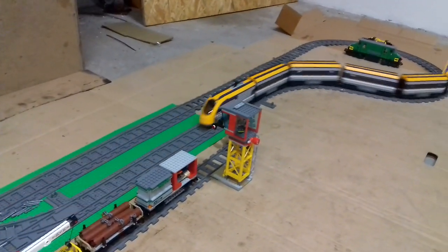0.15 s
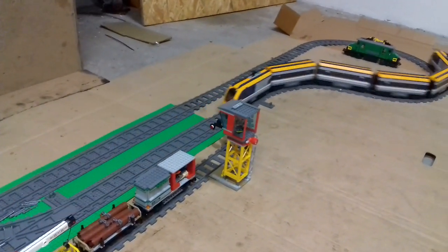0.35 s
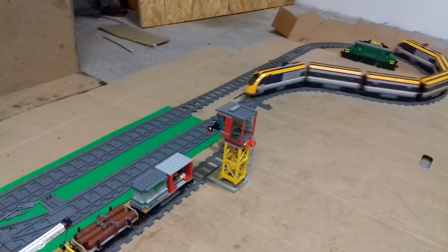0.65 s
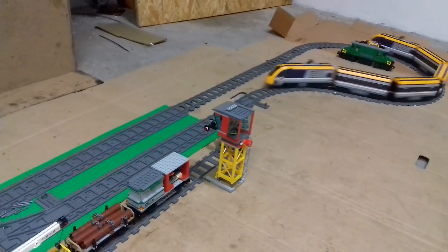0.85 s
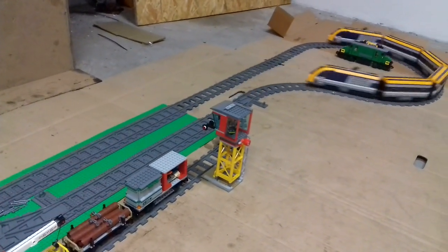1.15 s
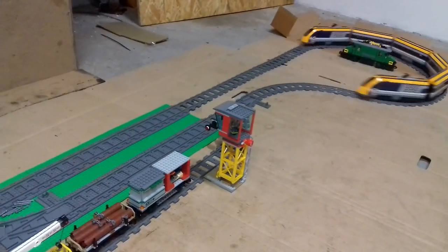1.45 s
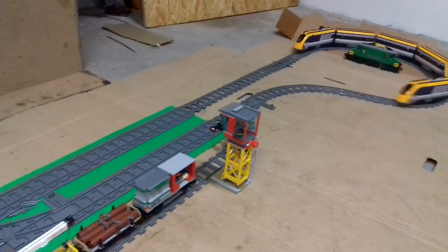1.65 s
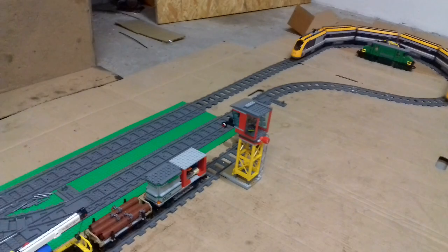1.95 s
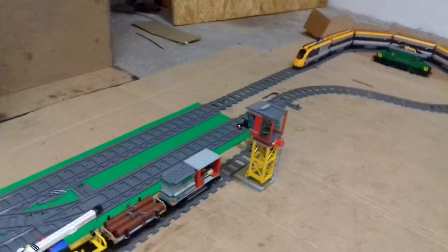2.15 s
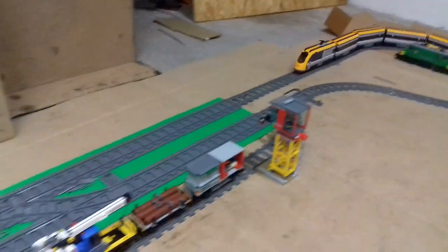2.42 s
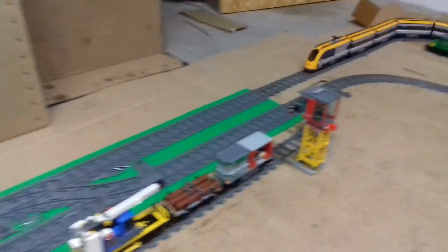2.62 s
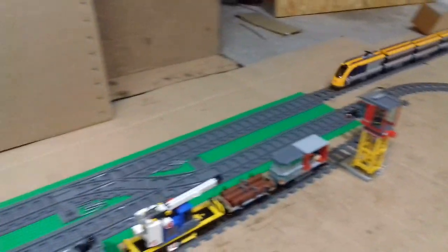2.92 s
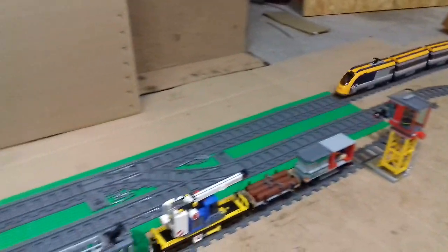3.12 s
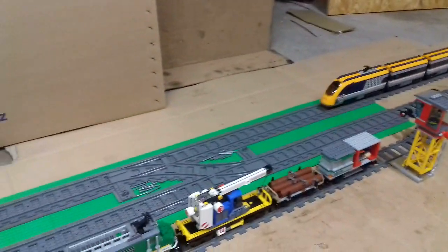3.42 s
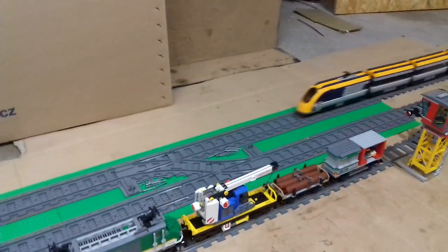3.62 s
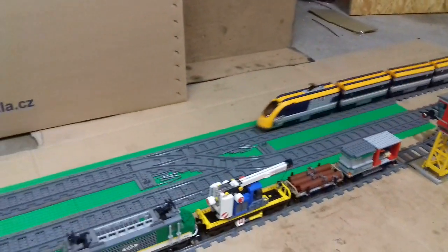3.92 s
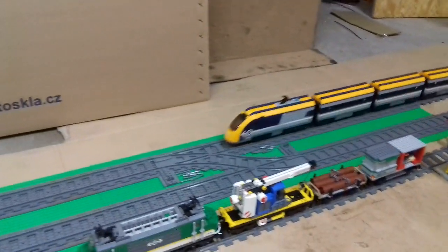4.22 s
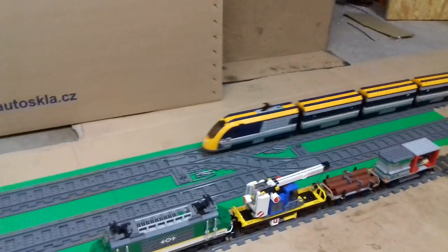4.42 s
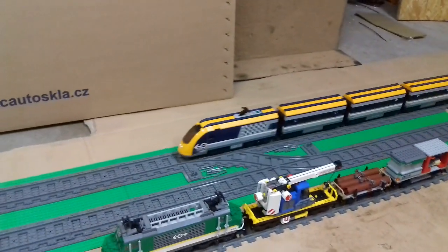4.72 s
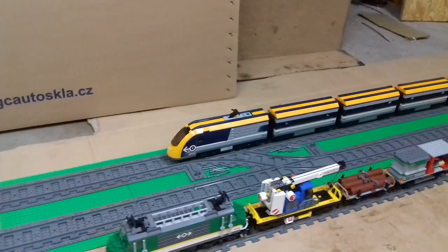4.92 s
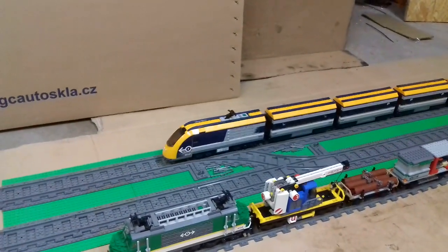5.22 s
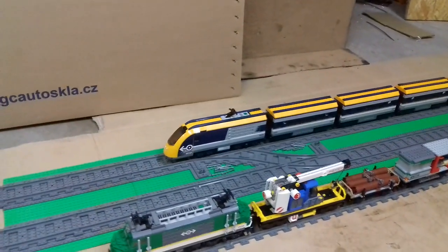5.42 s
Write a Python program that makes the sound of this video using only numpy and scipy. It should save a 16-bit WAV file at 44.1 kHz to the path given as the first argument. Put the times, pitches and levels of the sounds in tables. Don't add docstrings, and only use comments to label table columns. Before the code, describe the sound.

Inside a bare room, a small battery toy train is already running on plastic track. From 0 seconds there is a busy, grainy midrange rattle of hollow cars and hard plastic wheels, swelling irregularly as cars lurch, with clicks at rail joints near 0.05, 0.2, 1.1, 1.3 and 1.8 seconds. Around 2.1 seconds a hand lightly thuds the camera. Between 2.1 and 2.6 the train passes onto wider plates, quieter, less boxy and more clattery, with a joint knock at 2.6. From 3.5 to 4.5 the points produce tight bursts of sharp clacks, densest around 4.1 and 4.3. The drive stops near 3.8; rolling fades fast after 4.5, with sparse weakening ticks and a dry axle whisper. By 5.2 it is nearly silent; tiny coupling clicks sound until a clearer last one at 5.38. Faint hum and soft stereo hiss remain, with short room reverberation around the near-mono train.

```python
import sys
import numpy as np
from scipy import signal
from scipy.fft import rfft, irfft
from scipy.io import wavfile
from scipy.ndimage import uniform_filter1d

SR = 44100
rng = np.random.default_rng(int(sys.argv[2]) if len(sys.argv) > 2 else 0)


def generate_wav(sig):
    pcm = np.round(np.clip(np.atleast_2d(sig).T, -1, 1) * 32767).astype(np.int16)
    wavfile.write(sys.argv[1], SR, pcm)


def field_ratio(decibels):
    return 10 ** (np.asarray(decibels, dtype=float) / 20)


N = 245195

# (low edge [Hz], high edge [Hz])
PART_BANDS = [
    (95, 1162),
    (1300, 2346),
    (2300, 2880),
    (3200, 12200),
]
# (frequency [Hz], density [dB per Hz])
LOOP_COLOUR = [(65, -63), (110, -29), (309, -12), (446, -12), (557, -6.5), (700, -6), (950, -0.5),
               (1250, -0.5), (1620, -4), (2430, -4.5), (3520, -7), (4200, -7.5), (5200, -15.5),
               (5800, -26.5), (9000, -54.5), (19800, -120)]
# (frequency [Hz], density [dB per Hz])
PLATES_COLOUR = [(65, -51), (110, -17.5), (156, -25.5), (195, -11.5), (252, -14), (422, -11), (669, -4),
                 (805, -6.5), (950, -2), (1750, 1.5), (2770, 0.5), (3790, -0.5), (4900, -11.5),
                 (7210, -31.5), (9000, -42.5), (11700, -81), (19800, -120)]
# (start [s], end [s])
ONTO_PLATES = (2.1, 2.6)
# (start [s], end [s])
ONTO_POINTS = (3.6, 4.1)
# (time [s], level [dB])
ROLLING_LEVEL = [(0, -31.5), (.12, -34.5), (.6, -35.5), (1.0, -37.5), (1.15, -36.5), (1.5, -36.5),
                 (1.9, -37.5), (2.25, -40), (2.75, -41), (3.2, -41), (3.62, -41), (3.78, -38), (3.85, -42),
                 (4.0, -38.5), (4.48, -39.5), (4.9, -51.5), (5.2, -69), (5.56, -87.5)]
# (cars [dB], plates [dB], bogies [dB], rims [dB])
PART_SHARES = [
    (-3, -0.77, -1.5, -5.5),
    (-4, -0.35, -6, -4),
    (-6, 0, -9, -4.5),
]
MOTOR_OFF_S = 3.8
# (cars [dB/s], plates [dB/s], bogies [dB/s], rims [dB/s])
COAST_SLOPES = (2.5, -2, -9, -4)
# (time [s], running gear level [dB], hollow cars level [dB], decay [s])
LURCHES = [(.045, -1.5, 0, 0.067), (.2, 3, -2.5, 0.066), (.32, 1, 4.5, .04), (.52, 2, -0.9, .05),
           (.71, 3, 2.5, 0.033), (.88, 5, 5, 0.05), (1.07, 4.5, 3.5, .06), (1.26, 3, 3, .1),
           (1.55, 2, -1, 0.095), (1.77, 4.5, -4, .06), (1.96, 5, -0.5, 0.17), (2.12, 0.5, 1.5, 0.11),
           (2.4, 3.5, 2.5, 0.049), (2.625, 3.5, 1.5, 0.071), (2.93, -1.5, -2, .06), (3.28, 5, 1.5, 0.077),
           (3.505, 6, 5, 0.042), (3.72, 2.5, 2.5, .06), (3.865, 8, 4.5, 0.074), (4.04, 3, 6, 0.05),
           (4.345, 6.5, 5, 0.061), (4.45, 4.5, 2.7, 0.11), (4.67, 4.5, 0, .03), (4.87, -1, 2, 0.15)]
GEAR_RESPONSE = (0.93, 0.77, 0.76)
# (time [s], level [dB])
RIM_DIRECTIVITY = [(1.7, 0), (2.0, -1.5), (2.25, -1.5), (2.45, 0.5), (3.8, 0.5), (4.15, 2.5), (4.5, 0.2)]
# (time [s], peak level [dB], ring [Hz],
# crack level [dB])
RAIL_IMPACTS = [(0.0518, -21.5, 2320, -13), (0.2074, -20, 2630, -12), (1.0744, -25, 1440, -3),
                (1.2934, -23, 1680, -11), (1.786, -29, 1770, -15), (2.633, -23, 1850, -3),
                (3.5097, -27, 1694, -4), (3.7292, -25, 3200, -8), (3.869, -24, 1850, -23),
                 (3.8818, -22.5, 1657, 3.5), (3.906, -19, 1590, -22), (3.932, -24, 2100, -21),
                 (3.9444, -33, 1390, -7), (4.0194, -29, 1630, -5), (4.0638, -23, 1900, -17),
                 (4.0713, -18.5, 1775, -20), (4.0874, -21, 2030, -10), (4.105, -20, 1940, -19),
                 (4.114, -25, 2130, -8), (4.2258, -23, 1620, -14), (4.241, -25, 1610, -10),
                 (4.2682, -24, 1730, -15), (4.2834, -23, 1560, -13), (4.3128, -22.5, 1750, -15),
                 (4.344, -22, 1930, -18), (4.354, -20, 2000, 3.5), (4.3873, -23.5, 1720, -12),
                 (4.4154, -30, 1570, -8),
                (4.5254, -26, 2040, -19), (4.582, -24.5, 1670, -14), (4.6372, -27, 1700, -7),
                    (4.672, -33, 2500, -3), (4.714, -28, 1730, -20), (4.7435, -32.5, 1650, 0),
                    (4.8346, -37, 1810, -15), (5.02, -48, 1920, -13), (5.0414, -51, 1520, -10)]
# (frequency [Hz], width [Hz], level against rolling [dB])
BODY_MODES = [(311, 31, -28), (570, 39, -24), (653, 80, -26.5), (768, 19, -22.5), (1187, 36, -21)]
# (time [s], level [dB], length [ms], plate ring level [dB])
COUPLING_SLACK = [
    (5.208, -66, 3.6, -5),
    (5.234, -69, 4.6, 1.5),
    (5.303, -70, 6, 1.5),
    (5.379, -56.5, 4.3, 0),
]
# (time [s], level [dB], frequency [Hz], decay by 60 dB [s])
HAND_THUD = (2.1365, -42, 170, .04)
# (time [s], level [dB], frequency [Hz], half length [s])
HAND_RUB = (2.15, -71, 13800, .014)
# (frequency [Hz], density [dB per Hz])
ROOM_TONE = [(25, -21), (70, -1), (130, -5), (250, -1), (600, 0), (1800, -11), (3800, -14.5), (6500, -66),
             (15500, -25)]
# (frequency [Hz], level [dB], wander [dB])
HUM_TONES = [
    (101, -77, 1.5),
    (343, -75.5, 1),
    (14001, -100, 1.5),
]
# (frequency [Hz], density [dB per Hz])
HISS_COLOUR = [(25, -2), (110, 11), (400, 9.5), (900, 6), (4500, 7.5), (6500, 1.5), (9000, -2),
               (15500, -4.5)]

IMPULSE_LEN = 1024


def train(t):
    fft_len = 4096
    hz = np.fft.rfftfreq(fft_len, 1 / SR)
    on_plates = np.interp(t, ONTO_PLATES, (0, 1))
    shared = chatter(1100, 1.1)
    shared_flutter_db = 0.33 * walk(60)
    loose = 0.5 * on_plates * chatter(350, 1.94)
    out = 0
    for (lo, hi), level_db in zip(PART_BANDS, effort(t)):
        edges = 1 / np.sqrt((1 + (lo / (hz + 1)) ** 12) * (1 + (hz / hi) ** 12))
        own_contacts = 0.43 * chatter(1800, 2.12)
        grind = 0.76 * rng.standard_normal(N)
        force = 0.5 * shared + own_contacts + grind + loose
        loop, plates = (
            unit(signal.oaconvolve(force, causal(read(colour, hz) * edges)[:IMPULSE_LEN])[:N])
            for colour in (LOOP_COLOUR, PLATES_COLOUR))
        flutter_db = shared_flutter_db + 0.67 * walk(25.01)
        out = out + (loop + on_plates * (plates - loop)) * field_ratio(level_db + flutter_db)
    return out * field_ratio(-0.56)


def effort(t):
    on_plates = np.interp(t, ONTO_PLATES, (0, 1))
    on_points = np.interp(t, ONTO_POINTS, (0, 1))
    loop, straight, points = np.array(PART_SHARES)[:, :, None]
    level = np.interp(t, *np.transpose(ROLLING_LEVEL)) + loop
    level = level + on_plates * (straight - loop) + on_points * (points - straight)
    rise_s = 0.0033
    for s, gear_db, cars_db, decay_s in LURCHES:
        age = np.maximum(t - s, 0)
        shake = (1 - np.exp(-age / rise_s)) * np.exp(-age / decay_s)
        level = level + np.outer([cars_db, *(gear_db * np.array(GEAR_RESPONSE))], shake)
    level[-1] += np.interp(t, *np.transpose(RIM_DIRECTIVITY))
    return level + np.outer(COAST_SLOPES, np.maximum(t - MOTOR_OFF_S, 0))


def knocks():
    contact_ms = 0.54
    t = np.arange(IMPULSE_LEN) / SR
    age = t * 1000 / contact_ms
    push = age * np.exp(1 - age)
    hits = RAIL_IMPACTS
    grits = rng.standard_normal((len(hits), IMPULSE_LEN))
    out = np.zeros(N + IMPULSE_LEN)
    for (s, peak_db, hz, crack_db), grit in zip(hits, grits):
        scrape = 0.3 * contact_ms * grit
        ring = band((np.sin(2 * np.pi * hz * t) + scrape) * push, 0.956 * hz, 1.27 * hz)
        ring = ring / np.abs(ring).max()
        snap = grit ** 3 * push ** 2
        snap = band(band(band(snap, 2200, 5200), 1500, 5600), 1000, 6000)
        snap = snap / np.abs(snap).max()
        start = int(s * SR)
        out[start:start + IMPULSE_LEN] += field_ratio(peak_db) * (0.68 * ring + 0.9 * field_ratio(crack_db) * snap)
    return out[:N]


def rings(t):
    rolling_db = np.interp(t, *np.transpose(ROLLING_LEVEL))
    force = chatter(900, 2.0)
    body = sum(
        unit(band(force, hz - width / 2, hz + width / 2)) * field_ratio(db + 1.5 * walk(4))
        for hz, width, db in BODY_MODES)
    axle_hz, axle_width_hz, axle_db, linger_db_per_s = 3500, 710, -22.5, 11
    axles = unit(band(chatter(1500, 1.8), axle_hz - axle_width_hz / 2, axle_hz + axle_width_hz / 2))
    linger_db = linger_db_per_s * np.maximum(t - MOTOR_OFF_S, 0)
    return field_ratio(rolling_db) * (body + axles * field_ratio(axle_db + linger_db + 1.5 * walk(12)))


def settling(t):
    scrape = unit(band(band(chatter(2500, 1.5), 2000, 4000), 1500, 5600))
    ring = unit(band(rng.standard_normal(N), 1580, 1870))
    out = 0
    for s, db, ms, ring_db in COUPLING_SLACK:
        age = np.maximum(t - s, 0) * 1000 / ms
        out = out + field_ratio(db) * age * np.exp(1 - age) * (scrape + field_ratio(ring_db) * ring)
    return out


def hand(t):
    s, db, hz, t60 = HAND_THUD
    age = np.maximum(t - s, 0)
    thud = -np.sin(2 * np.pi * hz * age) * field_ratio(db - 60 * age / t60)
    tick = (t > s) * rng.standard_normal(N) * field_ratio(-62) * np.exp(-age / 0.0008)
    s, db, hz, half_s = HAND_RUB
    rub = unit(band(rng.standard_normal(N), 0.82 * hz, 1.08 * hz))
    rub = rub * field_ratio(db) * np.exp(-((t - s) / half_s) ** 2)
    return thud + tick + rub


def room(x):
    t60_s, level_db, places = 0.32, -14, 3
    t = np.arange(SR // 3) / SR
    out = x
    for k in range(places):
        tail = rng.standard_normal(len(t)) * (1 - np.exp(-t / 0.005)) * field_ratio(-60 * t / t60_s)
        tail = tail / np.sqrt(np.sum(tail ** 2))
        place = np.cos(np.pi * (k / places + 0.9 * np.arange(N) / SR)) * np.sqrt(2 / 3)
        out = out + field_ratio(level_db) * signal.fftconvolve(x * place, tail)[:N]
    return out


def floor(t):
    hums = sum(
        np.sin(2 * np.pi * hz * t + 0.4 * walk(6)) * field_ratio(db + wander_db * walk(5))
        for hz, db, wander_db in HUM_TONES)
    return shaped(ROOM_TONE, channels=1)[0] * field_ratio(-69) + hums


def chatter(rate, spread_db):
    luck = rng.uniform(-1, 1, N)
    size = rng.exponential(size=N)
    struck = np.abs(luck) < rate / SR
    return unit(struck * np.sign(luck) * field_ratio(spread_db * size))


def walk(rate):
    hold = int(SR / rate)
    steps = np.repeat(rng.standard_normal(N // hold + 1), hold)
    return 1.7 * uniform_filter1d(uniform_filter1d(steps, hold), hold)[:N]


def shaped(table, channels):
    spectrum = rfft(rng.standard_normal((channels, N)))
    return unit(irfft(spectrum * read(table, np.fft.rfftfreq(N, 1 / SR)), N))


def read(table, hz):
    f, db = np.transpose(table)
    return field_ratio(np.interp(np.log(hz + 1), np.log(f), db))


def causal(gain):
    cepstrum = irfft(np.log(gain + 1e-7))
    half = len(cepstrum) // 2
    cepstrum[1:half] *= 2
    cepstrum[half + 1:] = 0
    return irfft(np.exp(rfft(cepstrum)))


def band(x, lo_hz, hi_hz):
    sos = signal.butter(2, [lo_hz, min(hi_hz, 0.45 * SR)], "band", fs=SR, output="sos")
    return signal.sosfilt(sos, x)


def unit(x):
    return x / np.sqrt(np.mean(x ** 2))


def scene():
    t = np.arange(N) / SR
    moving = room(train(t) + knocks() + rings(t))
    return np.tile(moving + floor(t) + hand(t) + settling(t), (2, 1))


def band_limit(x):
    return signal.sosfilt(signal.butter(12, 15730, fs=SR, output="sos"), x)


def record(dry):
    loud = np.sqrt(uniform_filter1d(dry[0] ** 2, 4096))
    left, right, both = shaped(HISS_COLOUR, channels=3)
    hiss = (np.array([left, right]) + 0.36 * both) * field_ratio(-55.5 + 0.3 * walk(11))
    hiss = hiss * loud ** 0.24
    offset = -0.0007
    return band_limit(dry + hiss + offset)


dry = scene()
out = record(dry)
generate_wav(out)
```